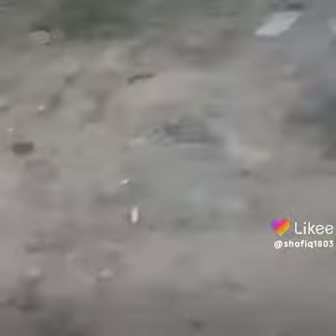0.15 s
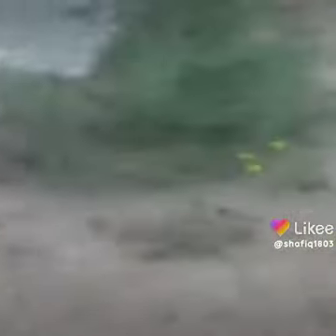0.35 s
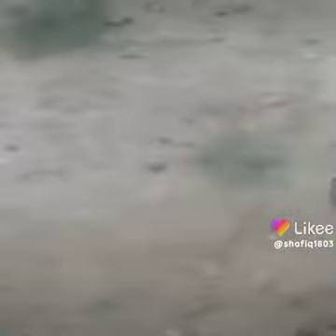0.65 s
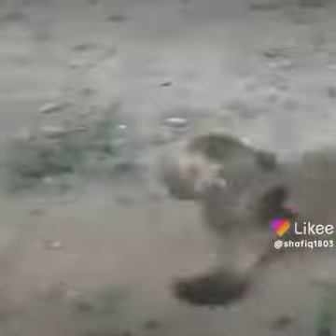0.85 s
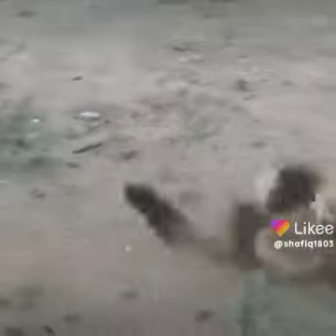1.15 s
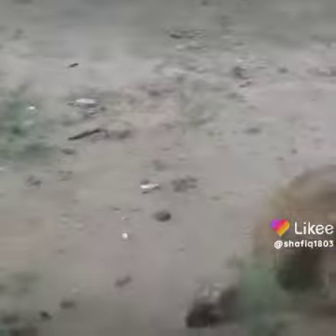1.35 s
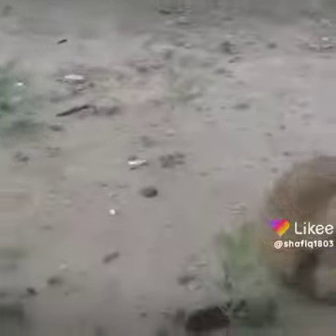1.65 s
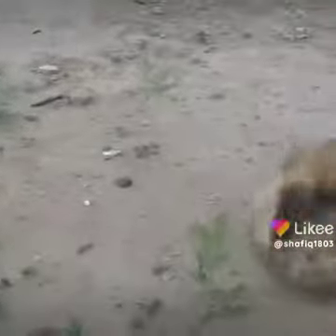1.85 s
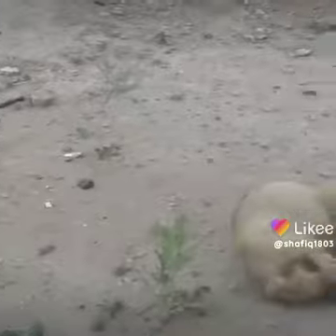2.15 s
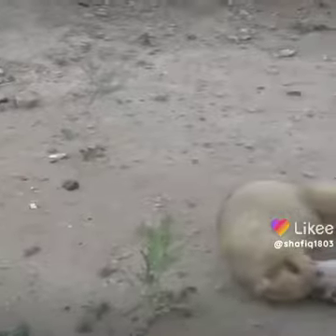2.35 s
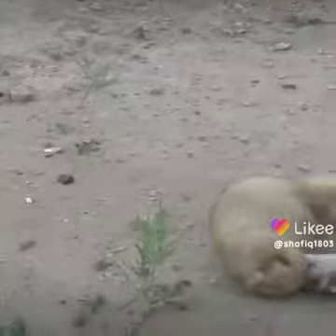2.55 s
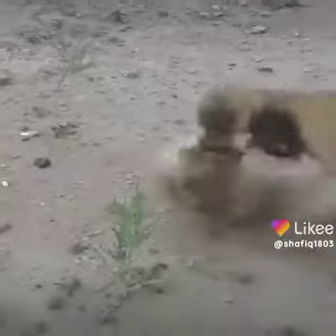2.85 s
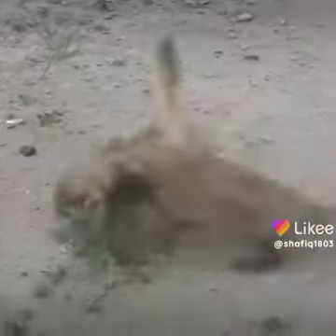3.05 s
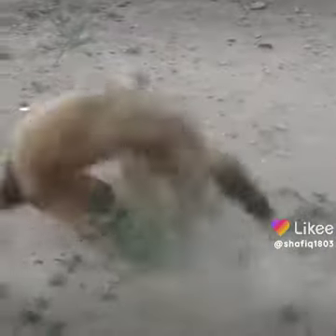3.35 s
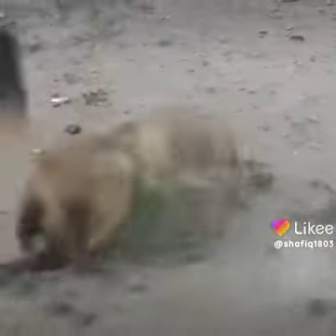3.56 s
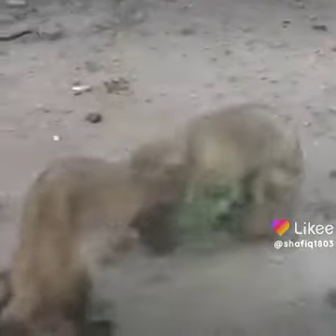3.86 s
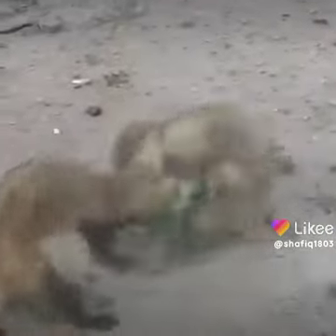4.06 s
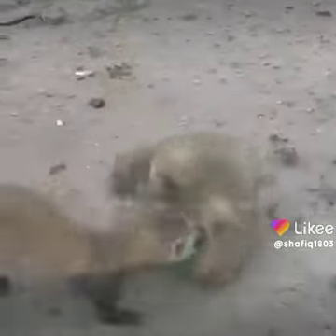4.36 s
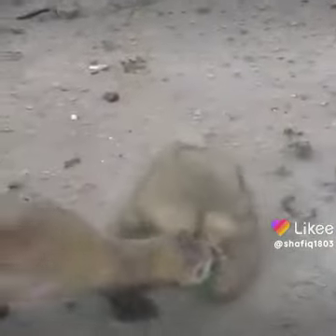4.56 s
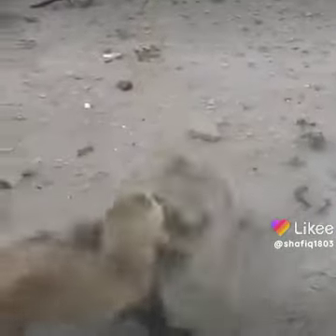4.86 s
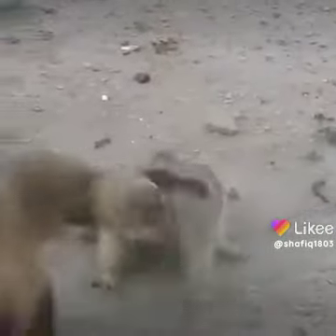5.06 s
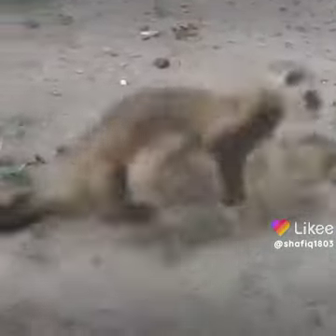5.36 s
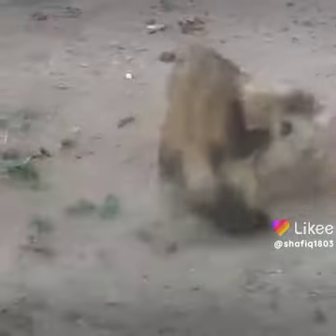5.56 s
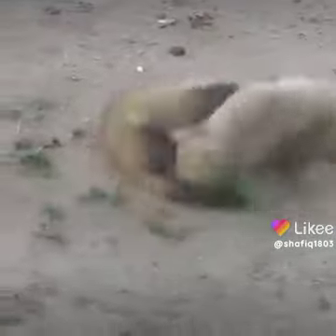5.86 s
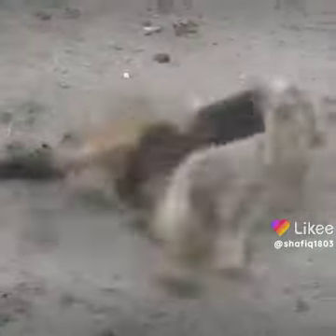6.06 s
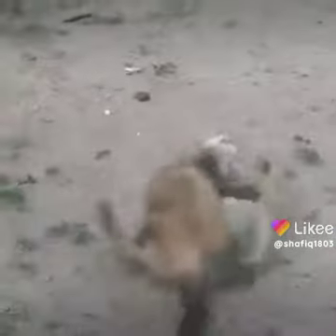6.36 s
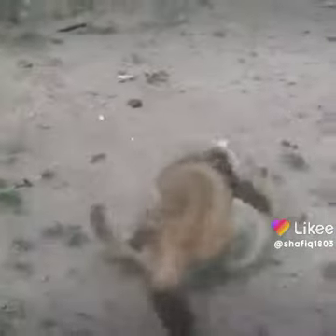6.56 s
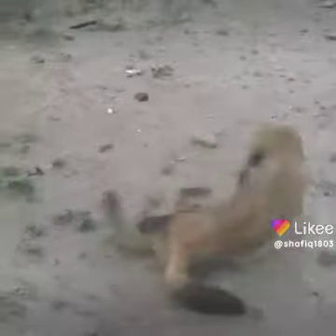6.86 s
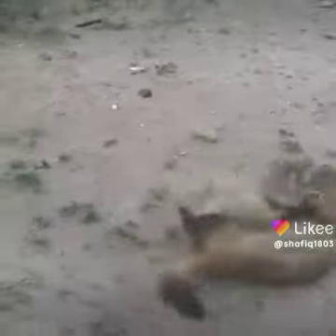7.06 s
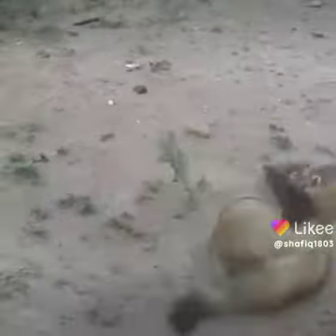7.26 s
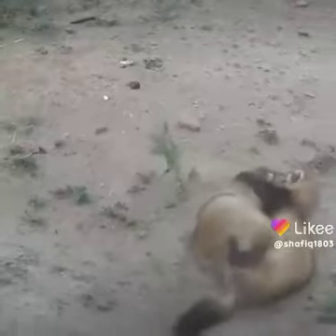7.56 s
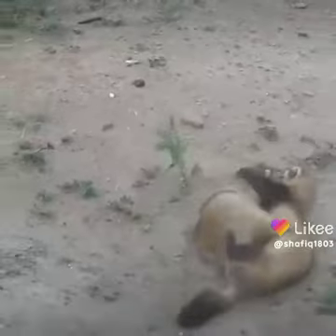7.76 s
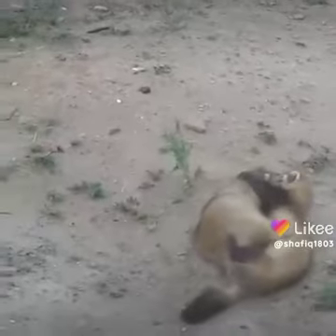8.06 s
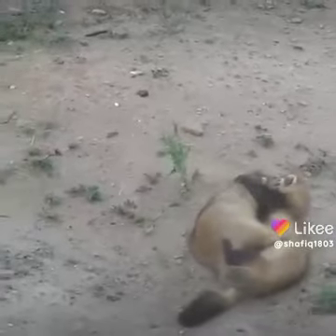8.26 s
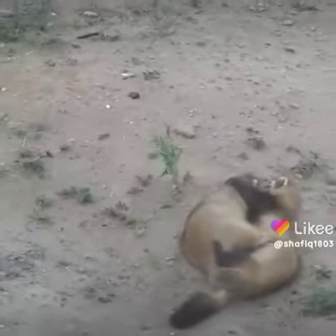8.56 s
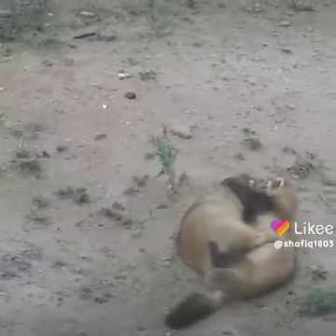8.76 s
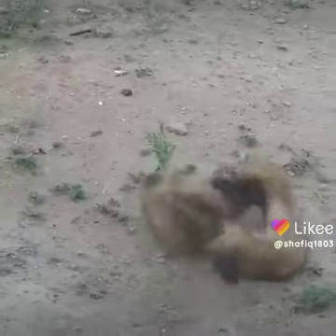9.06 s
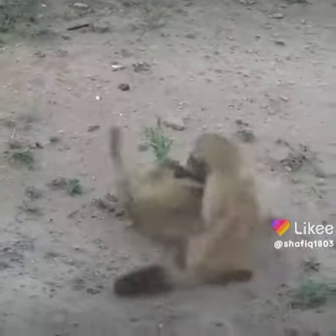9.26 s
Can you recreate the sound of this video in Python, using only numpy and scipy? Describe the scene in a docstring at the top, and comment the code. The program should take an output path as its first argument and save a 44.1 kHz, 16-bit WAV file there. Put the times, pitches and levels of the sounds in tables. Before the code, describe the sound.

A small animal squeals during a scuffle on dry ground: short whistling yelps first, then longer wavering shrieks about every half second, ending in rasp and mixed with gasps and thin wheezes. Lumpy wind rumbles and bumps the phone microphone over thin hiss. The squealing pauses near the end, leaving wind, sharp ticks and an insect-like pulse, then gasps and one last cut-off squeal.

```python
"""A short whistling squeal opens over thin outdoor hiss and wind: two small animals wrestle on dry dirt.
One squeals in arches of gliding harmonics that break into rasp, and gasps and wheezes as resonant noise.
Wind is lumpy low noise, with decaying sines where gusts bump the phone microphone; sharp ticks are noise bursts.
A faint far chatter is rising chirps, and an insect-like beat pulses the treble noise once the fight pauses.
The phone turns wind, hiss and treble down after loud squeals."""
import sys
import numpy as np
from scipy import signal
from scipy.io import wavfile
from scipy.ndimage import uniform_filter1d

SR = 44100
rng = np.random.default_rng(int(sys.argv[2]) if len(sys.argv) > 2 else 0)


def unload_wav(signal):
    """Save mono or channel-first audio to the path in sys.argv[1] as 16-bit WAV at rate SR, clipped to [-1, 1]."""
    wavfile.write(
        sys.argv[1],
        SR,
        np.round(np.clip(np.atleast_2d(signal).T, -1, 1) * 32767).astype(np.int16),
    )


N = 414540  # length in samples
EDGE_HZ = 16050  # top of the band


def amp(db):
    """Decibels to gain."""
    return 10 ** (np.asarray(db) / 20)


def evened(x):
    """Scales to rms 1."""
    return x / np.sqrt(np.mean(x ** 2) + 1e-20)


def add(mix, s, sound):
    """Mixes a sound in place at s seconds, cut off at the end of the mix."""
    part = mix[round(s * SR):][:len(sound)]
    part += sound[:len(part)]


def read(points, hz):
    """Reads a spectrum table at the frequencies hz, straight lines over log frequency."""
    f, value = np.transpose(points)
    return np.interp(np.log(hz + 1), np.log(f + 1), value)


def wobble(length, size):
    """Slow random drift of rms 1, smoothed twice over size samples."""
    return evened(uniform_filter1d(uniform_filter1d(rng.standard_normal(length), size), size))


def resonate(x, hz, width):
    """A steep resonance: shifts hz down to zero, smooths twice, shifts back."""
    turn = np.exp(2j * np.pi * np.cumsum(hz * np.ones(len(x))) / SR)
    r = np.exp(-np.pi * width / SR)
    smoothed = signal.lfilter([(1 - r) ** 2], [1, -2 * r, r * r], x / turn)
    return 2 * (turn * smoothed).real


def patchy(tone, size, patch_db, flicker_db):
    """Noise of a given spectrum with drifting patches and a flicker shared by all bins."""
    frames, hz = 4 * N // size + 5, np.fft.rfftfreq(size, 1 / SR)
    a, b, patches = rng.standard_normal((frames, len(hz), 3)).T
    patches = uniform_filter1d(patches, size=8, axis=0)  # across bins
    patches = evened(uniform_filter1d(patches, size=12, axis=1))  # across frames
    level_db = read(tone, hz)[:, None] + patch_db * patches + flicker_db * wobble(frames, size=4)
    spectrum = (a + 1j * b) * amp(level_db)
    return evened(signal.istft(spectrum, nperseg=size, noverlap=3 * size // 4)[1][:N])


# Colour of the outdoor floor. Each row: frequency in Hz, relative density in dB per Hz.
HISS_SPECTRUM = [(260, -45), (450, -8), (697, -3), (806, -16.5), (1030, -5), (2030, -4), (3260, -1.5),
                 (5910, -6.5), (8200, -5), (10700, -25.5), (18000, -120)]


def hiss():
    """The blotchy outdoor floor: steady noise whose bands drift."""
    return amp(-47) * patchy(HISS_SPECTRUM, size=1024, patch_db=5.5, flicker_db=0.84)


# Wind on the microphone before the phone ducks it.
# Each row: time in seconds, level in dB, deep rumble against that level in dB.
WIND_LEVELS = [(0.0, -38.5, -19), (0.68, -42, -19), (0.71, -27.5, -36), (0.99, -40.5, -1), (1.1, -23.5, -9),
               (1.15, -45.5, -7), (3.4, -29, 2), (3.59, -33, 17.5), (3.77, -36.5, -12), (5.26, -37, -6),
               (5.5, -27, 4.5), (5.63, -45.5, -3), (5.91, -28.5, 3), (6.2, -43, 1.5), (7.02, -34, -8.5),
               (7.1, -46.5, -13.5), (7.67, -28, 5.5), (7.75, -34.5, -2.5), (8.67, -28, -11),
               (8.77, -28.5, -3), (9.16, -28, 1.5), (9.4, -41, -4.5)]
# Colour of the wind's body. Each row: frequency in Hz, relative density in dB per Hz.
WIND_SPECTRUM = [(59, -43.5), (100, -2), (205, 1), (293, -7), (451, -32.5), (576, -38.5), (700, -33),
                 (910, -65), (1540, -120)]
# Colour of the deep rumble. Each row: frequency in Hz, relative density in dB per Hz.
RUMBLE_SPECTRUM = [(12, -23.5), (25, -11.5), (80, 1), (130, -10.5), (200, -45)]


def wind():
    """Lumpy low noise with a deeper, more unsteady rumble under it."""
    s, level_db, deep_db = np.transpose(WIND_LEVELS)
    t = np.arange(N) / SR
    body = patchy(WIND_SPECTRUM, size=2048, patch_db=1.0, flicker_db=0.5)
    deep = patchy(RUMBLE_SPECTRUM, size=2048, patch_db=1.0, flicker_db=7.5)
    gusts = amp(np.interp(t, s, level_db) + 2.9 * wobble(N, size=2500))
    return gusts * (body + amp(np.interp(t, s, deep_db)) * deep)


# Gusts that bump the membrane. Each row: start in seconds, level in dB before the envelope, pitch in Hz.
GUST_BUMPS = [(0.701, -17, 154), (1.01, -18, 59.7), (1.099, -24, 124), (1.753, -23.5, 74),
              (2.279, -17, 21.5), (2.968, -17.5, 87), (3.536, 0.5, 30.2), (4.314, -19.5, 118),
              (4.931, -5.5, 27.5), (5.473, -9, 108), (5.901, -20, 88.3), (7.273, -20.5, 77),
              (7.632, -6.5, 109.3), (8.761, -4, 81.5)]
BUMP_T60_S = .13  # time to fall by 60 dB


def bumps():
    """Single gusts knock the membrane: each is a quickly decaying low sine."""
    out, t = np.zeros(N), np.arange(SR // 3) / SR
    for s, db, hz in GUST_BUMPS:
        envelope = amp(db - 60 * t / BUMP_T60_S) * (1 - np.exp(-t / 0.002))
        add(out, s, envelope * np.sin(2 * np.pi * hz * t))
    return out


CHATTER_S, CHIRP_GAP_S, CHIRPS = 3.882, 0.037, 7  # start, start-to-start spacing, count
CHIRP_FROM_HZ, CHIRP_RISE_HZ = 3080, 560  # the rise shrinks away from the loudest place
CHATTER_DB, CHATTER_ARCH_DB = -38, -10  # level at the loudest place, change away from it


def chatter():
    """A faint far run of whistled chirps, each sliding up, loudest past its middle."""
    out, u = np.zeros(N), np.linspace(0, 1, SR // 26)
    for k in range(CHIRPS):
        off = (k / CHIRPS - .55) ** 2 / 0.32  # how far from the loudest place
        hz = CHIRP_FROM_HZ + CHIRP_RISE_HZ * (1 - .4 * off) * u ** 1.3
        hz = hz * (1 + 0.021 * wobble(len(u), size=80))
        swell = amp(CHATTER_DB + CHATTER_ARCH_DB * off) * np.sin(np.pi * u)
        add(out, CHATTER_S + k * CHIRP_GAP_S, swell * np.sin(2 * np.pi * np.cumsum(hz) / SR))
    return out


BEAT_FROM_S, BEAT_PERIOD_S, BEATS = 8.176, .155, 7
BEAT_DB, BEAT_RISE_S, BEAT_FALL_S = -32, 0.0022, .022  # level before the envelope, time constants


def insect_beat():
    """Strength of the steady insect-like beat: fast-rising pulses of slightly uneven level."""
    strength, t = np.zeros(N), np.arange(SR // 10) / SR
    envelope = np.exp(-t / BEAT_FALL_S) * (1 - np.exp(-t / BEAT_RISE_S))
    for k, chance in enumerate(rng.standard_normal(BEATS)):
        add(strength, BEAT_FROM_S + k * BEAT_PERIOD_S, amp(BEAT_DB + 1.2 * chance) * envelope)
    return strength


# Sharp treble ticks, some insect-like, some with a broad lower click.
# Each row: start in seconds, strength in dB before trims and envelopes, low part against it in dB.
SHARP_TICKS = [(.5184, -41, -0.5), (0.859, -32.5, 6.5), (1.77, -35, -9), (1.9704, -36, -6),
               (2.819, -29.5, 2), (3.249, -30.5, 2.5), (3.902, -32, -9), (3.9982, -33, -21),
               (4.0437, -35, -11), (4.704, -38, -9), (4.8456, -28, -6), (5.9094, -34.5, 2),
               (7.897, -25, -10), (8.0516, -34, -20), (8.1238, -23.5, -3), (8.4546, -29, -18),
               (8.79, -35, -27), (9.0613, -25, -4)]


def ticks():
    """Strengths of the sharp ticks: a short hissing tail in the treble and a broad lower click."""
    tails, clicks, t = np.zeros(N), np.zeros(N), np.arange(SR // 10) / SR
    for s, db, low_db in SHARP_TICKS:
        add(tails, s, amp(db - 4.5) * np.exp(-t / 0.019) * (1 - np.exp(-t / 0.0005)))
        add(clicks, s, amp(db + low_db - 9.0) * np.exp(-t / 0.032))
    return tails, clicks


# Colour of the treble bed. Each row: frequency in Hz, relative density in dB per Hz.
SIZZLE_SPECTRUM = [(7000, -41), (8400, -13), (10000, -1), (11500, -2.5), (13500, -3.5), (15500, -6),
                   (17000, -12.5)]


def sizzle():
    """Flickering treble noise, swelled by the insect-like beat and the ticks, plus the ticks' lower clicks."""
    bed = patchy(SIZZLE_SPECTRUM, size=256, patch_db=4.5, flicker_db=-1.0)
    floor = amp(-45 + 2.4 * wobble(N, size=2000))
    tails, clicks = ticks()
    click_noise = evened(resonate(rng.standard_normal(N), 3800, 10700))
    return (floor + insect_beat() + tails) * bed + clicks * click_noise


# Airway of the rasp and the gasps. Each row: resonance in Hz, width in Hz, level in dB.
AIRWAY_RESONANCES = [(1200, 600, -11), (1800, 500, -12), (2550, 800, 0), (3050, 800, 0), (3650, 1100, -4),
                     (5000, 1200, -16), (7300, 3200, -7), (11000, 4500, -10)]


def turbulence(length, factor, chest_db):
    """Rushing air coloured by the airway; chest_db lifts or sinks the lowest resonance."""
    air = rng.standard_normal(length)
    bands = [amp(db) * evened(resonate(air, hz * factor, width)) for hz, width, db in AIRWAY_RESONANCES]
    return evened(amp(chest_db) * bands[0] + sum(bands[1:]))


# Thin wheezes and far bird-like glides.
# Each row: start in seconds, end in seconds, first pitch in Hz, last pitch in Hz, level in dB before fades.
WHEEZE_GLIDES = [(0.79, 0.847, 1188, 1040, -41.5), (2.68, 2.853, 5400, 5260, -48.5),
                 (3.104, 3.73, 546, 335, -52.5), (4.705, 4.863, 3160, 4710, -44.5),
                 (5.751, 5.81, 1150, 1034, -42), (5.96, 6.018, 4960, 5430, -40.5),
                 (8.065, 8.32, 5640, 5320, -51), (8.24, 8.416, 4800, 3720, -53),
                 (8.711, 8.963, 1870, 2010, -51.5), (8.75, 8.897, 3900, 3900, -52),
                 (8.976, 9.025, 2570, 2720, -43.5)]


def wheezes():
    """Narrow resonances gliding through noise give thin breathy whistles."""
    out = np.zeros(N)
    for s, end, from_hz, to_hz, db in WHEEZE_GLIDES:
        count = round((end - s) * SR)
        glide_hz = np.linspace(from_hz, to_hz, count)
        whistle = resonate(rng.standard_normal(count), glide_hz, 0.027 * from_hz)
        add(out, s, amp(db) * evened(whistle) * signal.windows.tukey(count, .5))
    return out


# Gasps for air. Each row: start in seconds, length in seconds, level in dB before the swell,
# factor on the airway's resonant frequencies, chest resonance in dB.
GASP_BREATHS = [(0.301, 0.098, -41, 1.07, 8), (0.696, 0.069, -33, 1.1, 6.5),
                (0.779, 0.098, -43.5, 1.06, 19), (0.973, 0.029, -43.5, 1.4, -13),
                (2.047, 0.11, -43.5, 0.53, 5.5), (2.68, 0.16, -66, 1.2, -18),
                (3.065, 0.074, -43.5, 1.47, 4), (3.661, 0.34, -43, 1.15, 29), (4.679, 0.17, -39, 0.77, -11),
                (5.289, 0.25, -51.5, 1.1, -1), (5.77, 0.09, -45, 0.63, -1), (7.709, 0.19, -41.5, 0.83, -25),
                (8.998, 0.15, -31, 1.05, -24), (9.127, 0.13, -27.5, 1.06, 3.5)]


def gasps():
    """Air rushes through the airway in single unsteady swells."""
    out = np.zeros(N)
    for s, length, db, factor, chest_db in GASP_BREATHS:
        count = round(length * SR)
        swell = np.sin(np.pi * np.arange(count) / count) ** 0.78
        swell = swell * amp(1.8 * wobble(count, size=300))
        add(out, s, amp(db) * swell * turbulence(count, factor, chest_db))
    return out


# Third and higher harmonics against the voice, by where they fall in the mouth.
# Each row: frequency in Hz, level in dB.
UPPER_MOUTH = [(3000, -23), (5000, -13.5), (7500, -15.5), (8300, -30), (9000, -45.5), (10800, -18.5),
               (13000, -40.5), (15000, -44)]
# The second harmonic by where it falls in the mouth. Each row: frequency in Hz, level in dB.
SECOND_MOUTH = [(3000, -18), (4000, -14), (4800, -23), (5500, -21.5), (6100, -28.5), (6700, -18.5),
                (7400, -8), (8200, 0)]
# The second harmonic follows this share of the fundamental's swing about a loud squeal.
LOUD_DB, FOLLOW = -10.5, 0.067
ONSET_DB, ONSET_S = 6, .02  # the second harmonic starts strong, then settles
# Pitch waver (share) and rasp time constant (s) grow with roughness.
WAVER, ROUGH_WAVER, RASP_S, ROUGH_RASP_S = 0.002, 0.018, 0.0055, 0.021
HALF_LINES = .9  # slack, rough folds alternate strong and weak cycles


def squeal(rows, second_db, drift_db, upper_db, rasp_db, rough):
    """A whistling stack of harmonics that breaks into rasp as the folds let go."""
    s, *columns = np.transpose(rows)
    t = np.arange(s[0], s[-1] + 0.074, 1 / SR)
    hz, first_db = (np.interp(t, s, c) for c in columns)
    left, rough = s[-1] - t, np.clip(rough, 0, 1)

    # the folds let go towards the end, unless the squeal runs up to the end of the scene
    rasp_s = RASP_S + ROUGH_RASP_S * rough
    slack = np.exp(-np.maximum(left - .015, 0) / rasp_s) * (s[-1] < N / SR - 1 / 100)

    hz = uniform_filter1d(hz, size=300)
    second_db = second_db + read(SECOND_MOUTH, 2 * hz) + FOLLOW * (first_db - LOUD_DB)
    second_db += drift_db * np.linspace(-.5, .5, len(t))
    second_db += ONSET_DB * np.exp(-(t - s[0]) / ONSET_S)
    hz = hz * (1 + (WAVER + ROUGH_WAVER * rough + 0.053 * slack) * wobble(len(t), size=150))
    turn = 2 * np.pi * np.cumsum(hz) / SR

    shimmer_db = (.9 + 3 * slack) * wobble(len(t), size=120)
    flutter_db = 4 * (.5 + rough + slack) * wobble(len(t), size=200)
    voice = amp(first_db + shimmer_db) * np.sin(turn)
    voice += amp(second_db + flutter_db) * np.sin(2 * turn)

    effort_db = uniform_filter1d(np.maximum(first_db, second_db), size=900)
    for k in range(3, 7):  # the upper harmonics flutter
        flutter = amp(2.5 * wobble(len(t), size=90)) * (k * hz < EDGE_HZ)
        voice += amp(effort_db + upper_db + read(UPPER_MOUTH, k * hz)) * flutter * np.sin(k * turn)
    voice *= 1 + HALF_LINES * rough * slack * np.cos(turn / 2)

    # a faint narrow treble hiss follows the squeal's loudness
    voice += amp(effort_db - 33) * evened(resonate(rng.standard_normal(len(t)), 10900, 900))
    voice *= np.sqrt(2) * np.clip(np.minimum(left, t - s[0]) / 0.0013, 0, 1)

    # air leaks faintly all along, and rasps as the folds slacken
    rasp = (amp(-47.5) + amp(rasp_db) * slack) * np.exp(-np.maximum(-left, 0) / 0.015)
    rasp = rasp * amp(2.63 * wobble(len(t), size=120))
    return s[0], voice + rasp * turbulence(len(t), 1.098, 0.)


# One contour a squeal. Each row of a contour: time in seconds, pitch in Hz, fundamental in dB.
SQUEAL_CONTOURS = [
    [(0.016, 2645, -35), (0.028, 2950, -21.5), (0.056, 3700, -20.5), (0.063, 3650, -28), (0.069, 2900, -30),
     (0.078, 2450, -43)],
    [(0.205, 2550, -44), (0.209, 2860, -19.5), (0.229, 3690, -9.5), (0.249, 3900, -9), (0.268, 4004, -10),
     (0.281, 4100, -31), (0.297, 2674, -29), (0.306, 2600, -48)],
    [(0.738, 2470, -38), (0.742, 2316, -9), (0.766, 3040, -11.5), (0.778, 2610, -21.5), (0.786, 2150, -47)],
    [(1.0, 3610, -40), (1.03, 3680, -38), (1.046, 3775, -8.5), (1.06, 3830, -6.5), (1.084, 3390, -26.5),
     (1.105, 3720, -19.5), (1.128, 3950, -6), (1.146, 3876, -10.5), (1.164, 2880, -17),
     (1.206, 2340, -14.5), (1.222, 2340, -46)],
    [(1.243, 1980, -28), (1.249, 2310, -10.5), (1.261, 2950, -23), (1.273, 2700, -30)],
    [(1.522, 2426, -25.5), (1.536, 2786, -39), (1.542, 3250, -9), (1.556, 3890, -19.5), (1.608, 4000, -29),
     (1.62, 4070, -22), (1.684, 3800, -12), (1.688, 3790, -19), (1.706, 2480, -15), (1.73, 1555, -73)],
    [(2.193, 2173, -35.5), (2.213, 2860, -14.5), (2.225, 3370, -5.5), (2.249, 3634, -18.5),
     (2.283, 3684, -13), (2.321, 3375, -7.5), (2.387, 3454, -7), (2.403, 3360, -7.5), (2.421, 2780, -32),
     (2.431, 1710, -42)],
    [(2.842, 3000, -26), (2.85, 2910, -18.5), (2.874, 2300, -30.5), (2.902, 3040, -6), (2.91, 3320, -13.5),
     (2.952, 3300, -22.5), (2.976, 3523, -8.5), (3.004, 3546, -14), (3.034, 2316, -13.5),
     (3.056, 1620, -61)],
    [(3.431, 2750, -25), (3.437, 2770, -5), (3.447, 3170, -18), (3.465, 3335, -17), (3.523, 3320, -8),
     (3.591, 3360, -15.5), (3.613, 3206, -11.5), (3.641, 2250, -36)],
    [(4.171, 1930, -38), (4.175, 2237, -15), (4.205, 3280, -9.5), (4.235, 3437, -9), (4.261, 3464, -12.5),
     (4.303, 3220, -21), (4.326, 3320, -14.5), (4.35, 3450, -25.5), (4.389, 3553, -13.5),
     (4.443, 3462, -7.5), (4.465, 2800, -15), (4.475, 2610, -27.5), (4.495, 1530, -49)],
    [(4.88, 2375, -23), (4.885, 2470, -19), (4.898, 2840, -30.5), (4.916, 3230, -6), (4.952, 3394, -10),
     (4.992, 3356, -7.5), (5.018, 2943, -12.5), (5.066, 3403, -10), (5.122, 3562, -14.5), (5.156, 3524, -9),
     (5.174, 3094, -17), (5.206, 2850, -7), (5.232, 1910, -46)],
    [(5.477, 2307, -20), (5.489, 2700, -8.5), (5.499, 3270, -25), (5.513, 3370, -9), (5.541, 3200, -9.5),
     (5.549, 2970, -15.5), (5.571, 2785, -9.5), (5.615, 2903, -7.5), (5.635, 3210, -18), (5.657, 2610, -24),
     (5.689, 2384, -23), (5.7, 2174, -38), (5.733, 2040, -47), (5.761, 1576, -64)],
    [(6.054, 2120, -28.5), (6.062, 2337, -14.5), (6.08, 2820, -10), (6.122, 2913, -8.5),
     (6.138, 3350, -25.5), (6.158, 3575, -10.5), (6.195, 3510, -4.5), (6.24, 3493, -17.5),
     (6.274, 3490, -5.5), (6.3, 2834, -19), (6.342, 2913, -8), (6.36, 3590, -14), (6.382, 3594, -1),
     (6.402, 2840, -18), (6.416, 1920, -56.5)],
    [(6.749, 2364, -27.5), (6.753, 2396, -16.5), (6.769, 3190, -10), (6.795, 3624, -24),
     (6.847, 3710, -11.5), (6.881, 3592, -1), (6.921, 3866, -17.5), (6.945, 3910, -18),
     (6.976, 3520, -14.5), (7.009, 3320, -13.5), (7.029, 2510, -15), (7.044, 2296, -48)],
    [(7.551, 2160, -21.5), (7.558, 2440, -17.5), (7.579, 3190, -15), (7.593, 3560, -33), (7.631, 3680, -39),
     (7.647, 3510, -23), (7.665, 2520, -15.5), (7.685, 2170, -44)],
    [(9.245, 2660, -50), (9.249, 2526, -6.5), (9.275, 3550, -24), (9.293, 3720, -24.5),
     (9.313, 3683, -14.5), (9.367, 3350, -8.5), (9.397, 3430, -3)],
]
# Voice colour of each squeal in turn. Each row: second harmonic in dB, its drift from start to end in dB,
# upper harmonics in dB, closing rasp in dB, roughness from 0 to 1.
SQUEAL_COLOURS = [(-7, -4, 8, -39, 0), (-9, 17.5, -9, -33, 0.08), (-13, 0, 5, -45, .1),
                  (-20, 8.5, 1.5, -48, 0), (-23, -12, -1, -69, 0), (-13.5, -15, 14.5, -35, 0.3),
                  (-1, 5, .5, -34.5, .15), (-19, 18, 2, -27.5, .45), (-12, -2.5, 16.5, -30, 0.11),
                  (-7.5, 0, 2.5, -36.5, .25), (-15.5, -19.5, 0, -33, 0.1), (-6.5, 6, 7, -30, 0.92),
                  (-12.5, -5, -13, -39, 0.08), (-9.5, 9, 7.5, -42, .05), (-5.5, 22, 3, -33.5, 0.3),
                  (-3, 30, 2.5, -34, 0.2)]


def squeals():
    """The run of squeals, each a pitch contour sung with its own colour."""
    out = np.zeros(N)
    for rows, colour in zip(SQUEAL_CONTOURS, SQUEAL_COLOURS):
        add(out, *squeal(rows, *colour))
    return out


def animal():
    """Squeals, gasps and wheezes, with a brief decaying scatter from the ground around."""
    voices = squeals() + gasps() + wheezes()
    t = np.arange(SR // 3) / SR
    scatter = rng.standard_normal(len(t)) * amp(-60 * t / 0.27) * (t > .004)
    scatter /= np.linalg.norm(scatter)
    return voices + amp(-25.5) * signal.oaconvolve(voices, scatter)[:N]


def ducking(x, fall_db, above_db):
    """Decibels by which x was lately over a threshold, smoothed; the held level sinks fall_db a second."""
    power_db = 10 * np.log10(abs(uniform_filter1d(x ** 2, size=800)) + 1e-12)
    fall = np.arange(N) * fall_db / SR
    held_db = np.maximum.accumulate(power_db + fall) - fall
    return signal.lfilter([.0004], [1, -.9996], np.maximum(held_db - above_db, 0))


def scene():
    """All sources at the one microphone; the phone turns the background down after loud squeals."""
    voices = animal()
    slow_db = ducking(voices, fall_db=6, above_db=-15.0)
    quick_db = ducking(voices, fall_db=40, above_db=-21)
    background = amp(-.4 * quick_db) * wind()
    background += amp(-.6 * slow_db) * hiss()
    background += amp(-.45 * slow_db) * sizzle()
    return (background + chatter() + bumps() + voices)[None]


def record(dry):
    """A soft ceiling rounds off the peaks, then a steep lowpass limits the band."""
    ceiling = .72
    held = dry / (1 + abs(dry / ceiling) ** 6) ** (1 / 6)
    lowpass = signal.firwin(511, EDGE_HZ, window=("kaiser", 9), fs=SR)
    return signal.oaconvolve(held, lowpass[None], "same")


dry = scene()
out = record(dry)
unload_wav(out)
```